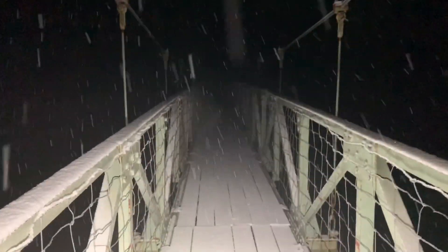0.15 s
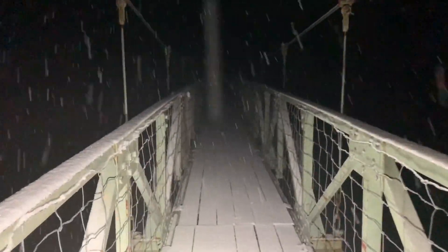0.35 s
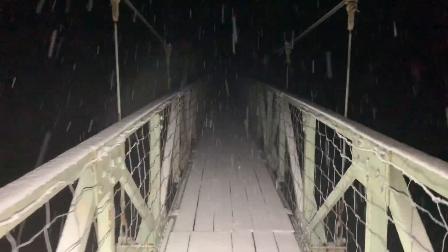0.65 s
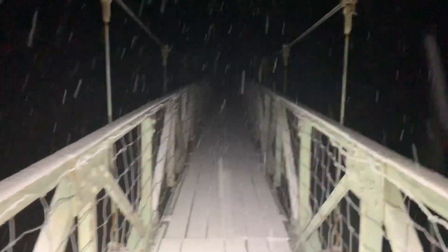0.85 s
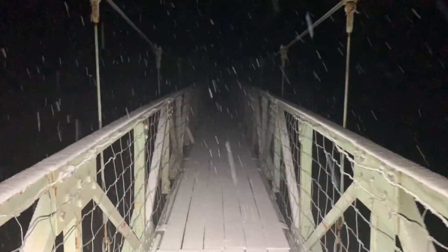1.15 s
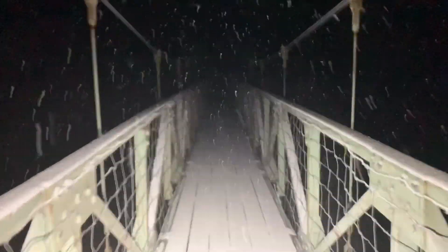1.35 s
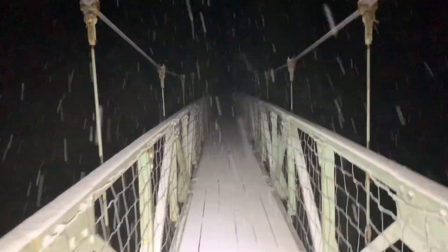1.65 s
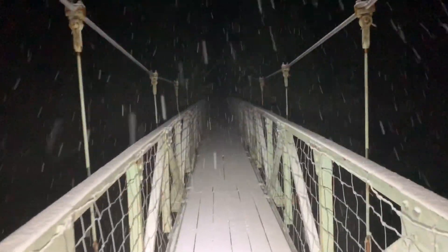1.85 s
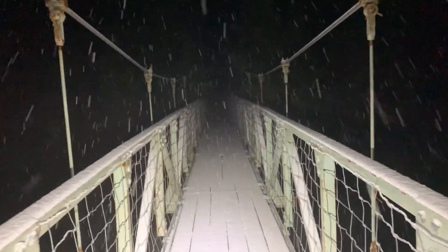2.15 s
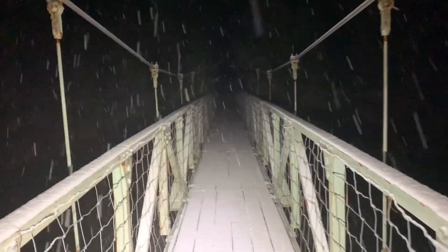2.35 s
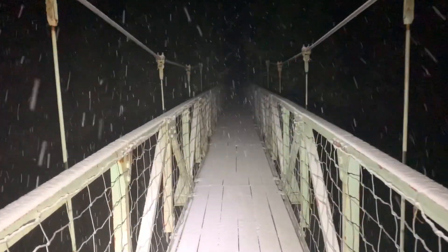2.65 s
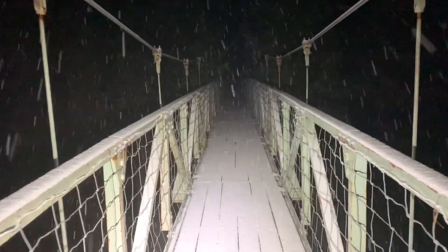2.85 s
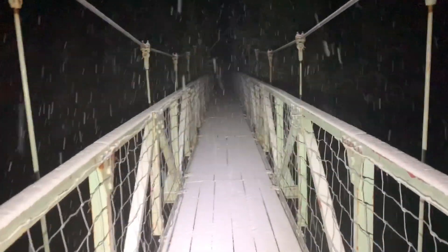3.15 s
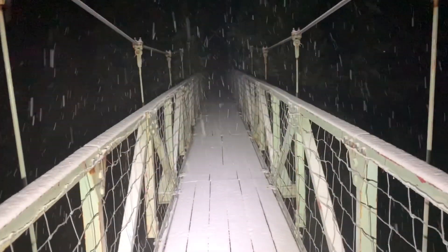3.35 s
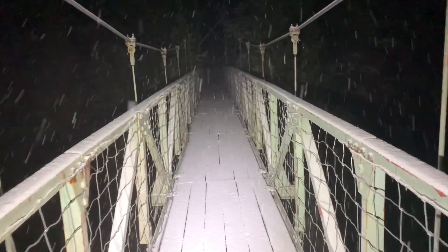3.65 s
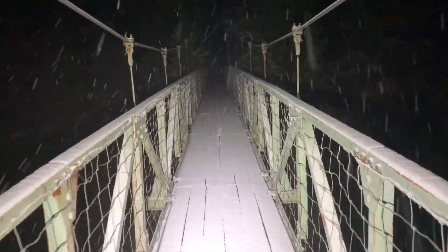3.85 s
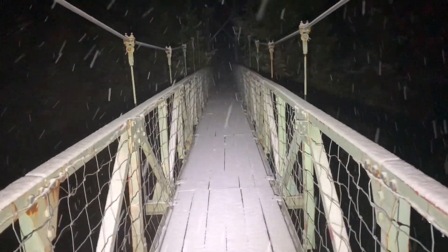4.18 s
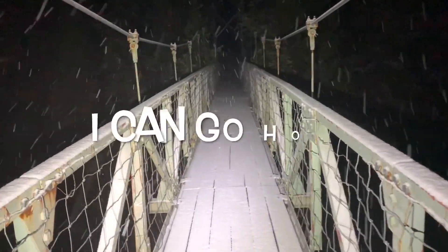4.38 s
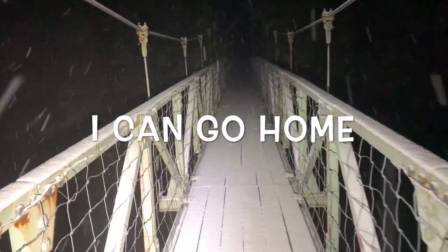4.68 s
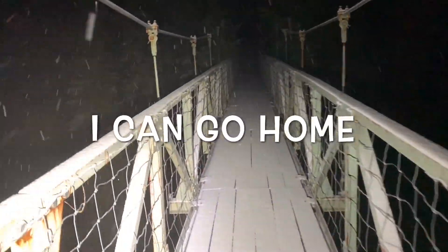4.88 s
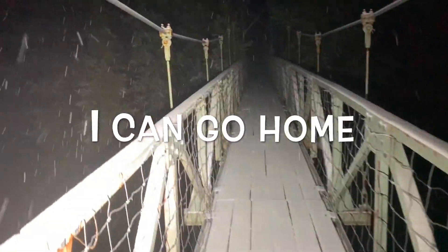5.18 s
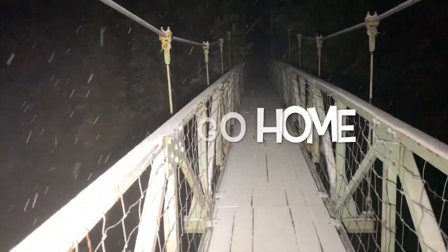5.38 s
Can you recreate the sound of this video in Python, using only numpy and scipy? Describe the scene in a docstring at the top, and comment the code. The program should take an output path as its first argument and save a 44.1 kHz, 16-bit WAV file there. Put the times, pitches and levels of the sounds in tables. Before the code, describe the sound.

Someone walks along a snowy wooden footbridge on a quiet night, holding a phone. Heavy boots strike hollow planks in uneven clusters of heel, sole and loose-board thumps. Early on, jacket fabric swishes and snaps, and fingers rub the phone, then knock it very loudly at about 1.4 seconds. Afterwards steadier steps continue with soft snowy brushing and faint rising scuffs, over low deck rumble and light wind buffeting.

```python
"""Boots on the snowy planks of a footbridge at night, heard by a hand-held phone with two microphone ports.
Night bed, deck rumble, wind, port hiss and swishing clothes are shaped noise; fabric ticks are short cracks.
Among them, from early on, heels, soles and loose boards thump the deck: filtered blows ring plank and span modes.
Finger rubs (noise) and case knocks (struck resonances) join in, and later rising coloured scuffs,
narrow noise bands gliding upward between further blows."""
import sys
import numpy as np
from scipy import signal
from scipy.fft import rfft, irfft, next_fast_len
from scipy.io import wavfile
from scipy.ndimage import uniform_filter1d

SR = 44100
rng = np.random.default_rng(int(sys.argv[2]) if len(sys.argv) > 2 else 0)


def wrap_up_sound(samples):
    """Save the sound to the file named by the first command line argument, as 16-bit audio."""
    columns = np.atleast_2d(samples).T
    # keep every value between -1 and 1, then stretch to whole-number steps
    tamed = np.clip(columns, -1, 1)
    steps = np.round(tamed * 32767).astype(np.int16)
    wavfile.write(sys.argv[1], SR, steps)


N = 243431

# night bed, relative spectrum: (f/Hz, level/dB)
NIGHT_SPECTRUM = [(59, -27.5), (100, -6), (276, -3.5), (1590, -16.5), (3000, -23.5), (6030, -21.5),
                  (9810, -24), (10900, -51), (12600, -35.5), (13800, -23), (15600, -57.5)]
# air buffeting the ports: (t/s, level/dB)
WIND_LEVEL = [(0, -74.5), (.4, -58), (1.6, -53.5), (1.95, -70.5), (2.6, -56), (3.45, -70), (5.2, -57.5),
              (5.52, -65)]
# hiss at the right port, level before the left/right split: (loudest t/s, rise t/s, fall t/s, level/dB)
PORT_HISSES = [(0.0, 0.11, 0.17, -66.5), (.55, 0.42, 0.27, -51), (.92, 0.01, 0.17, -45.5),
               (1.1, 0.26, 0.073, -55), (1.4, 0.55, 0.32, -59.5)]
# swishes of legs and clothes: (loudest t/s, rise t/s, fall t/s,
# boots brushing snow level/dB, coarse jacket folds level/dB, fine weave level/dB)
CLOTHES_SWISHES = [(0.02, 0.2, 0.28, -64.5, -65.5, -63), (0.36, 0.24, 1, -62.5, -59.5, -56.5),
                   (0.6, 0.36, .17, -45.5, -48.5, -52.5), (0.925, 0.043, 0.12, -51.5, -56, -65),
                   (1.235, 0.25, 0.41, -55.5, -60.5, -74), (1.4, 0.045, 0.17, -50, -51.5, -52),
                   (1.79, 0.46, 0.13, -66.5, -66, -67.5), (2.03, 0.1, 0.047, -54, -60.5, -66),
                   (2.18, .1, 0.19, -58, -82, -83.5), (2.7, 0.083, 0.12, -56.5, -62, -76),
                   (2.88, 0.083, 0.13, -52, -66.5, -68), (3.06, 0.47, 0.19, -60, -67, -76),
                   (3.39, 0.074, 0.034, -58.5, -61.5, -77.5), (3.64, 0.16, 0.13, -59, -63.5, -67.5),
                   (3.82, 0.08, 0.079, -55.5, -67.5, -75), (4.48, 0.12, 0.031, -53, -66.5, -69),
                   (4.6, 0.084, 0.087, -65, -67, -69), (4.8, 0.15, 0.12, -58.5, -64.5, -70),
                   (4.93, 0.29, 0.16, -57.5, -79, -93), (5.09, 0.22, 0.24, -65, -65, -69.5),
                   (5.17, 0.089, 0.16, -60, -78, -70), (5.52, 0.094, 0.12, -50.5, -60, -78)]
# stiff fabric snapping: (t/s, peak level/dB, f/Hz)
FABRIC_TICKS = [(0.4673, -24.5, 6660), (0.51, -28, 6800), (0.518, -24.5, 6260), (0.092, -46, 1810),
                (0.814, -40, 3580), (2.238, -46, 2300)]
# blows on the deck: (t/s, thud peak level/dB before panning, thud f/Hz, knock level/dB re thud, knock f/Hz,
# deep sway level/dB re thud, ring level/dB re thud, hollow ring f/Hz)
DECK_BLOWS = [(0.272, -47.5, 298, -3, 980, -15.5, 1, 353), (0.464, -37.5, 318, 4.5, 1230, -3, 3.5, 363),
              (0.488, -32, 300, -7, 700, -20, -6.5, 320), (0.510, -13.5, 262, -6.5, 2330, -12, -7, 480),
              (0.632, -23, 370, -3.5, 1510, -3.5, -5, 395), (0.689, -29.5, 211, -9, 980, -22, -7, 293),
              (0.794, -41, 216, -7, 1000, -26.5, -1, 293), (1.302, -23, 250, -9.5, 1010, -11, -8.5, 328),
              (1.363, -20, 143.7, -13.5, 1410, -1, 2, 238), (2.222, -32.5, 449, -0.5, 2140, 1, 2.5, 447),
              (2.377, -19, 302, -5, 1370, -13.5, -7.5, 433), (2.383, -15.5, 253, -30.5, 1342, -14, -6, 358),
              (2.697, -24, 235, -2.5, 1303, -38.5, -4.5, 309),
              (2.942, -22, 327, -13.5, 1250, -5.5, -8, 343), (2.979, -18, 159, -8, 1030, -18, -19, 248),
              (3.012, -30.5, 145, -9, 1270, -5, -7.5, 240), (3.049, -28.5, 153, -6, 700, -19, -0.5, 250),
              (3.065, -27, 246, -7, 1750, -6, -4, 308), (3.098, -29.5, 238, -10.5, 1710, -22, -12, 308),
              (3.625, -41, 197, -8, 1000, -9, 0, 280), (3.666, -35, 188.6, -10, 1055, -10, -5, 280),
              (3.774, -16.5, 190, -10.5, 1340, -7.5, -6.5, 400),
              (4.064, -25.5, 404, -17, 2000, -22, -8, 703), (4.068, -22, 248, -38.5, 1000, -23, -8.5, 353),
              (4.372, -46, 225, -21, 1000, -27, -10.5, 300), (4.586, -44.5, 436, -15, 1220, -23, -3, 440),
              (4.736, -12, 223, -6, 1590, -5.5, -7.5, 341), (4.951, -19, 337, -12, 800, -48.5, -9, 366),
              (4.990, -22.5, 173, -5, 830, -4.5, -6, 278), (5.032, -34.5, 166, 3.5, 810, -27.5, -7, 260),
              (5.071, -20, 178, -12, 700, -24.5, -9.5, 216), (5.156, -25, 189, -46, 1130, -30, -8, 230),
              (5.182, -22, 239, -22, 1200, -37, -8.5, 313)]
# modes of the planks, typical pitch and relative level: (f/Hz, level/dB, t60 t/s)
PLANK_MODES = [(105.5, -5, 0.19), (138.6, 7.5, 0.071), (203.6, -2.5, 0.11), (240.3, 1, 0.088),
               (347, -3, 0.091), (455, -4, 0.043), (541.6, -1, 0.012), (714.5, -9, 0.067)]
# modes of the whole span, typical pitch and relative level: (f/Hz, level/dB, t60 t/s)
SPAN_MODES = [(42, -8, 0.11), (64, -14, 0.32)]
# fingers rubbing the case: (full from t/s, rise t/s, hold t/s, fall t/s, level/dB)
FINGER_RUBS = [(0.915, 0.013, .19, 0.068, -43.5), (1.218, 0.11, .01, 0.25, -51.5),
               (1.398, .04, 0.0093, 0.041, -28.5), (1.459, .03, .005, 0.048, -32),
               (1.529, .06, 0.0071, 0.041, -42.5)]
# knocks on the case: (t/s, case peak level/dB, case f/Hz, case width f/Hz, crack level/dB re case, crack f/Hz)
CASE_KNOCKS = [(1.387, -32, 540, 460, 14.5, 1510), (1.411, 0.5, 667, 373, -36, 3520),
               (1.527, -33, 530, 1100, -4.5, 970), (1.465, -9, 594, 650, -14.5, 1970)]
# a rub singing in one narrow band: (loudest t/s, rise t/s, fall t/s, level/dB, f/Hz at its loudest)
COLOURED_SCUFFS = [(2.028, 0.067, .03, -53.5, 1228), (2.76, 0.11, 0.33, -66, 4340),
                   (3.39, 0.073, .03, -56.5, 1595), (4.44, .05, 0.075, -50.5, 1273),
                   (4.37, .08, .1, -71.5, 5860), (4.57, 0.11, .05, -69.5, 5600)]
# finger rub, relative spectrum: (f/Hz, level/dB)
RUB_SPECTRUM = [(300, -19.0), (420, -6.0), (600, -4.5), (820, -2.5), (930, -10.0), (1050, -19), (1300, -46.5)]
# port hiss, relative spectrum: (f/Hz, level/dB)
PORT_SPECTRUM = [(7850, -18.0), (8050, 2.5), (9000, -1.5), (10500, -14), (11500, -31)]

NIGHT_DB, RUMBLE_DB = -66.5, -69
LATE_S = 0.004077  # delay of 200 Hz behind the treble in every hit
SWELL_ROUND = 1.107  # 1 = pointed swells, 2 = bell-shaped
PAN_SPREAD_DB = 1.5  # spread of the random left/right level difference of a blow's body
RUB_GRAIN_DB = 1.8
SCUFF_WIDTH, SCUFF_CLIMB_HZ_PER_S = 0.25, 1500  # width as a share of the pitch
SCUFF_UPPER, SCUFF_UPPER_DB = 1.8, -11  # pitch and level of the upper band re the lower
BASS_CUT_HZ, TOP_HZ = 33, 15650

SIZE = 2 ** 15  # samples set aside for one hit
HIT_T, HIT_HZ = np.arange(SIZE) / SR, np.fft.rfftfreq(SIZE, 1 / SR)
LEFT_RIGHT = np.array([[1], [-1]])


def undb(db):
    """Amplitude gain of a level in dB."""
    return 10 ** (np.asarray(db) / 20)


def peak(hz, centre_hz, width_hz):
    """Response of a resonance, gain 1 at the centre."""
    return 1 / (1 + 1j * (hz ** 2 - centre_hz ** 2) / (width_hz * hz + 1e-9))


def hump(hz, centre_hz, width_hz):
    """Steep-sided gain of a resonance passed twice."""
    return np.abs(peak(hz, centre_hz, width_hz)) ** 2


def points(hz, table):
    """Gain drawn through (f/Hz, level/dB) points, dropping to -70 dB outside them."""
    f, db = np.transpose(table)
    return undb(np.interp(np.log(hz + 1), np.log(f), db, left=-70, right=-70))


def walk(rate):
    """Random levels chosen rate times a second and slewed; spread near 1."""
    k = int(SR / rate)
    steps = np.repeat(rng.standard_normal(N // k + 1), k)
    return 0.93 * uniform_filter1d(steps, k)[:N]


def hiss(shape, apart_hz, grain_db, rate):
    """Two-channel noise of rms 1 with a flickering level, the channels growing alike below apart_hz."""
    size = next_fast_len(N)
    hz = np.fft.rfftfreq(size, 1 / SR)
    flicker = undb(grain_db * np.resize(walk(rate), size))
    mid, side = rfft(rng.standard_normal((2, size)) * flicker)
    share = np.hypot(hz, .08 * apart_hz) / np.hypot(hz, apart_hz)
    stereo = (mid + share * side * LEFT_RIGHT) / np.sqrt(1 + share ** 2)
    x = irfft(shape(hz) * stereo, size)[:, :N]
    return x / x.std()


def swells(s, rise, hold, fall, *levels):
    """Gain per level column: rows swell, hold and fade, 20 dB down one rise before and one fall after the top."""
    dt = np.arange(0, N + 32, 32) / SR - s  # one gain per 32 samples
    away = np.maximum(-dt, 0) / rise + np.maximum(dt - hold, 0) / fall
    shape = undb(-20 * away ** SWELL_ROUND)
    return [np.repeat(np.sqrt(((undb(db) * shape) ** 2).sum(0)), 32)[:N] for db in levels]


def unheld(table):
    """Swells that fade as soon as they peak."""
    s, rise, *rest = np.transpose(table)[:, :, None]
    return swells(s, rise, 0, *rest)


def ring(modes, t):
    """Struck modes, peak 1; each blow finds other gains and slightly other pitches."""
    hz, db, t60 = np.transpose(modes)[:, :, None]
    gain_chance, pitch_chance = rng.standard_normal((2, len(modes), 1))
    tones = np.sin(2 * np.pi * hz * (1 + 0.043 * pitch_chance) * t)
    x = (undb(db + 2 * gain_chance) * tones * 1000. ** (-t / t60)).sum(0)
    return x / np.abs(x).max()


def crack(t, hz, centre_hz, t60, grit_db):
    """A blunt tap and a short scrunch after it, partly different at each port; peak 1."""
    noise = rng.standard_normal((2, len(t))) * .8 + rng.standard_normal(len(t))
    scrunch = rfft(noise * (1000. ** (-t / t60) + undb(-22.5) * 1000. ** (-t / 0.16)))
    notch = undb(-4.5) * peak(hz, .55 * centre_hz, 0.2 * centre_hz) ** 2
    wood = peak(hz, centre_hz, .5 * centre_hz) ** 2 - notch
    grit = undb(grit_db) * (peak(hz, 4526, 3000) ** 3 + undb(-19.5) * peak(hz, 15000, 2500) ** 2)
    x = irfft((scrunch + 8) * wood + scrunch * grit)  # the 8 is the tap, an impulse
    return x / np.abs(x).max()


def add(out, x, s, hz, lag_s):
    """Place a hit: its lows arrive later than its highs, and the left channel comes lag_s after the right."""
    # cycles of delay; the .003 s is room for the earlier channel, taken back below
    turn = 2 * LATE_S * np.sqrt(200 * hz) + .003 * hz + np.outer([lag_s / 2, -lag_s / 2], hz)
    x = irfft(rfft(x * np.ones((2, 1))) * np.exp(-2j * np.pi * turn))
    i = int((s - .003) * SR)
    out[:, i:i + SIZE] += x[:, :N - i]


def night_bed():
    """The steady bed of the night: broad noise with a faint flicker."""
    return undb(NIGHT_DB) * hiss(lambda f: points(f, NIGHT_SPECTRUM), 1700, 0.5, 22)


def deck_rumble():
    """The deck keeps rumbling: low noise whose level wavers slowly."""
    return undb(RUMBLE_DB) * hiss(lambda f: hump(f, 170, 180), 700, 1.423, 5.6)


def wind():
    """Air buffets the ports: very deep noise following the wind level."""
    s, db = np.transpose(WIND_LEVEL)
    level = np.interp(np.arange(N) / SR, s, db)
    return undb(level) * hiss(lambda f: hump(f, 42, 58), 180, 0.89, 28)


def port_hiss():
    """A finger hisses past the right port: a high noise band, faint on the left."""
    noise = hiss(lambda f: points(f, PORT_SPECTRUM), 1, 1.563, 73)
    return unheld(PORT_HISSES)[0] * undb([[-12], [5]]) * noise


def clothes():
    """Snow and cloth are brushed as the legs swing: three grainy noise bands swell together."""
    boots, coarse, fine = unheld(CLOTHES_SWISHES)
    brush = hiss(lambda f: hump(f, 1214, 686) + undb(-4.5) * hump(f, 1920, 800)
                 + undb(0.5) * hump(f, 686, 500), 1500, 2.7, 200)
    folds = hiss(lambda f: hump(f, 4180, 1200) + hump(f, 3000, 1400), 1300, 2.7, 150)
    weave = hiss(lambda f: hump(f, 5800, 2000) + undb(-12.5) * hump(f, 8600, 1800), 1500, 3.3, 170)
    return boots * brush + coarse * folds + fine * weave


def ticks():
    """Stiff fabric snaps: bright cracks whose main burst lasts a few milliseconds."""
    out = np.zeros((2, N))
    for s, db, tick_hz in FABRIC_TICKS:
        add(out, undb(db) * crack(HIT_T, HIT_HZ, tick_hz, 0.01, -35), s, HIT_HZ, 0)
    return out


def deck():
    """Each blow: a short thud, a woody knock with grit, planks rung by chattering contact, and the span's sway."""
    out, t, hz = np.zeros((2, N)), HIT_T, HIT_HZ
    for s, db, thud_hz, knock_db, knock_hz, sway_db, ring_db, hollow_hz in DECK_BLOWS:
        # the sole pushes for a while, so the treble is barely stirred
        soft = 1 / (1 + 1j * hz / (4 * thud_hz)) ** 4
        # the weight lands just after the edge of the sole
        late = np.exp(-2j * np.pi * hz * 0.00201)
        hollow = undb(ring_db + 2) * peak(hz, hollow_hz, 40)
        thud = irfft((peak(hz, thud_hz, 0.66 * thud_hz) - hollow) * soft * late)

        # loose boards keep tapping their beams
        decays = np.array([1000. ** (-t / 0.08), undb(-11) * 1000. ** (-t / 0.45)])
        short, long = rfft(rng.standard_normal(SIZE) * decays)
        # the modes of the plank underfoot speak loudest; the long tail sinks to the low modes
        contact = short * peak(hz, hollow_hz, 300) + long * peak(hz, 310, 380)
        ringing = irfft(rfft(ring(PLANK_MODES, t)) * contact)

        body = thud / np.abs(thud).max()
        body += undb(ring_db) * ringing / np.abs(ringing).max()
        body += undb(sway_db) * ring(SPAN_MODES, t)
        # each blow's body gets a small random left/right level difference
        pan = undb(PAN_SPREAD_DB * rng.standard_normal() / 2 * LEFT_RIGHT)
        knock = undb(knock_db) * crack(t, hz, knock_hz, 0.031, -31.5)
        add(out, undb(db) * (pan * body + knock), s, hz, -.00004)
    return out


def finger_rubs():
    """Stick-slip rubbing rings the hollow case: grainy noise in the case's band."""
    s, rise, hold, fall, db = np.transpose(FINGER_RUBS)[:, :, None]
    noise = hiss(lambda f: points(f, RUB_SPECTRUM), 1813, RUB_GRAIN_DB, 150)
    return swells(s, rise, hold, fall, db)[0] * noise


def case_knocks():
    """Knocks ring the hollow case: a damped resonance with a lower one under it, and a crack."""
    out, hz = np.zeros((2, N)), HIT_HZ
    for s, db, case_hz, width_hz, crack_db, crack_hz in CASE_KNOCKS:
        case = peak(hz, case_hz, width_hz)
        soft = 1 / (1 + 1j * hz / 1200) ** 2
        knock = irfft((case + undb(-12.0) * peak(hz, 220, 300)) * case * soft)
        snap = undb(crack_db) * crack(HIT_T, hz, crack_hz, 0.039, -19.5)
        add(out, undb(db) * (knock / np.abs(knock).max() + snap), s, hz, .00022)
    return out


def scuffs():
    """Grainy rubbing whose narrow resonance climbs as the stroke speeds up, with a weaker one above it."""
    out, t = 0, np.arange(N) / SR
    for s, rise, fall, db, hz in COLOURED_SCUFFS:
        turns = 2 * np.pi * (hz * (t - s) + SCUFF_CLIMB_HZ_PER_S * (t - s) ** 2 / 2)
        swell = unheld([(s, rise, fall, db)])[0]
        for ratio, gain in ((1, 1), (SCUFF_UPPER, undb(SCUFF_UPPER_DB))):
            # slow noise riding on a gliding carrier makes a gliding noise band
            slow = signal.butter(2, SCUFF_WIDTH * hz * ratio / 2, fs=SR, output="sos")
            a = signal.sosfilt(slow, rng.standard_normal((3, N)))
            b = signal.sosfilt(slow, rng.standard_normal((3, N)))
            band = a * np.cos(ratio * turns) + b * np.sin(ratio * turns)
            band = band * undb(2.4 * walk(120))
            band = band[0] + 0.67 * band[1:]  # one shared part, one of its own per port
            out = out + gain * swell * band / band.std()
    return out


def scene():
    """All layers together, the right port slightly louder."""
    beds = night_bed() + deck_rumble() + wind()
    walker = clothes() + ticks() + deck() + scuffs()
    hand = port_hiss() + finger_rubs() + case_knocks()
    return undb(np.array([[-.3], [.3]])) * (beds + walker + hand)


def record(dry):
    """The microphone loses the deepest bass; the phone clips the loudest peaks and cuts the top."""
    bass_cut = signal.butter(3, BASS_CUT_HZ, "high", fs=SR, output="sos")
    top_cut = signal.ellip(12, .2, 80, TOP_HZ, fs=SR, output="sos")
    heard = signal.sosfilt(bass_cut, dry)
    return signal.sosfilt(top_cut, np.clip(heard, -.98, .98))


dry = scene()
out = record(dry)
wrap_up_sound(out)
```